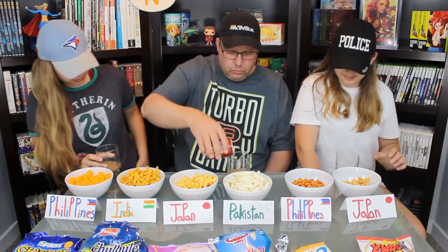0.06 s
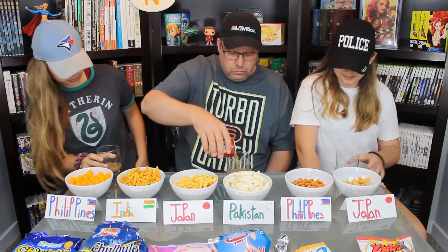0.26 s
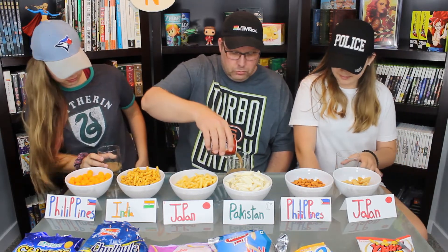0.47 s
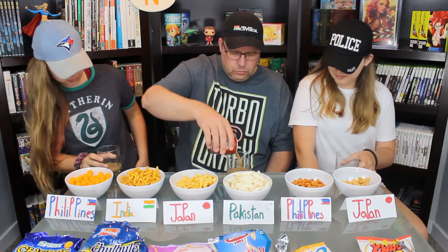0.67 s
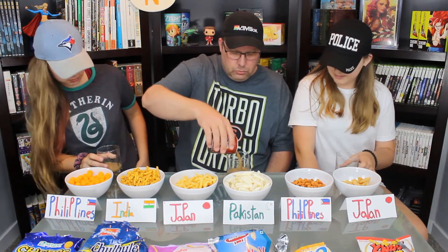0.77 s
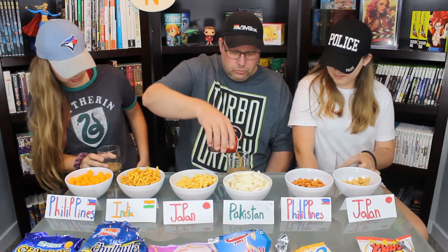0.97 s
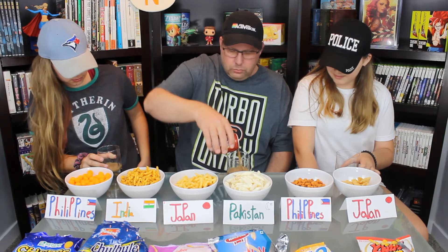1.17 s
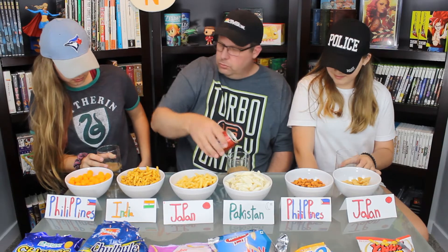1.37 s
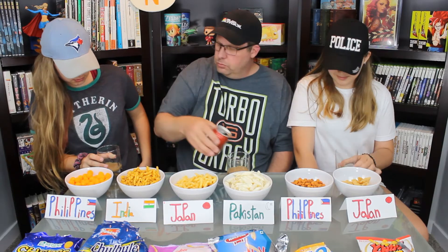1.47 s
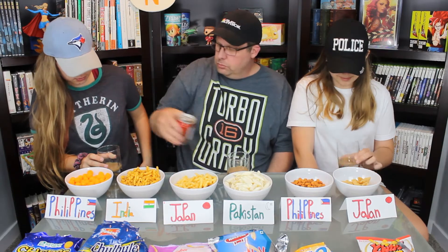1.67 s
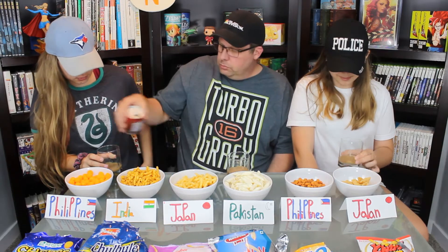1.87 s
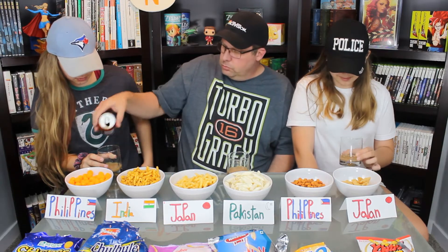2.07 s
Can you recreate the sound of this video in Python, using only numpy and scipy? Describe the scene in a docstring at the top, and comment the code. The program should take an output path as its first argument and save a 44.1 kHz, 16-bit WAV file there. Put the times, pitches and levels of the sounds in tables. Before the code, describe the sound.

Last of an iced coffee plips and trickles from a small can into a glass indoors

```python
"""Over a steady low rumble and wide hiss, there is a dull double knock on a table in a small room.
The last of an iced coffee plips, splashes and trickles from a small can into a glass.
The can ticks and clacks as it is drawn away. Blows ring decaying tones over bursts of noise,
drops ring as bubbles, splashes and trickle are shaped noise, and near walls add echoes."""
import sys
import numpy as np
from scipy import signal
from scipy.fft import rfft, irfft
from scipy.io import wavfile

SR = 44100
rng = np.random.default_rng(int(sys.argv[2]) if len(sys.argv) > 2 else 0)


def materialize(psi):
    """Save the field psi as 16-bit PCM at rate SR to the path in sys.argv[1].

    A 1-D psi becomes a single channel; in a 2-D psi each row is a channel.
    """
    bounded = np.clip(np.atleast_2d(psi).T, -1, 1)
    quanta = np.round(bounded * 32767).astype(np.int16)
    wavfile.write(sys.argv[1], SR, quanta)


N = 92610  # length in samples
T = np.arange(N) / SR  # time in seconds


def undb(db):
    """Turn decibels into a gain."""
    return 10 ** (np.asarray(db) / 20)


def fade(t60):
    """Die away exponentially, falling 60 dB in t60 seconds."""
    return np.exp(-np.log(1000) * T / max(t60, 1e-3))


def swell(rise_s):
    """Start softly, approaching full strength with this time constant in seconds."""
    return 1 - np.exp(-T / max(rise_s, 1e-5))


def place(sound, start_s):
    """Delay a sound to its start time by putting silence before it."""
    silence = np.zeros(max(int(round(start_s * SR)), 0))
    return np.concatenate([silence, sound])[:N]


def colour(sound, points):
    """Reshape the spectrum along (Hz, dB) points, then set the rms to 1."""
    hz, db = np.array(points, float).T
    bins_hz = np.maximum(np.arange(N // 2 + 1) * SR / N, 1)
    gain = undb(np.interp(np.log(bins_hz), np.log(hz), db))
    coloured = irfft(rfft(sound) * gain, N)
    return coloured / coloured.std()


def noise(points):
    """Make random noise with the given spectrum and an rms of 1."""
    return colour(rng.standard_normal(N), points)


def strike(blows, modes, spectrum, crack_db, crack_t60, snap_db, rise_s):
    """Each blow snaps, then rings the modes over a short crack; longer contact sounds duller."""
    ring = np.zeros(N)
    for hz, db, t60 in modes:
        ring += undb(db) * fade(t60) * np.sin(2 * np.pi * hz * T)
    ring *= swell(rise_s)
    snap_t60 = 0.0071  # seconds
    burst = undb(crack_db) * fade(crack_t60) + undb(snap_db) * fade(snap_t60)

    out = np.zeros(N)
    for start, db, contact_ms in blows:
        hit = ring + burst * noise(spectrum)
        # One-pole smoothing over the contact time takes off the treble
        keep = np.exp(-1000 / (max(contact_ms, .001) * SR))
        softened = signal.lfilter([1 - keep], [1, -keep], hit + 1e-18)
        out += undb(db) * place(softened, start)
    return out


# Balance of the background in the middle. Each row: pitch in Hz, relative level in dB per Hz.
MIDDLE_SPECTRUM = [(15, -51), (25, -7.5), (86, -0.5), (188, -5), (340, -10), (445, -11.5), (482, -12),
                   (703, -17), (895, -17), (1080, -19.5), (1900, -22.5), (2230, -22), (3720, -23),
                   (5880, -24), (15500, -27.5)]
# Balance of the background at the sides. Each row: pitch in Hz, relative level in dB per Hz.
SIDE_SPECTRUM = [(15, -60), (25, -14.5), (119, -14), (410, -18.5), (445, -17), (970, -22), (15500, -19)]


def background():
    """Low room rumble in the middle; microphone hiss, opposite in left and right, sounds wide."""
    middle_db, side_db = -60, -67
    middle = undb(middle_db) * noise(MIDDLE_SPECTRUM)
    side = undb(side_db) * noise(SIDE_SPECTRUM)
    return middle + side * np.array([[1], [-1]])


# Near reflections. Each row: delay in seconds, level in dB against the direct sound.
REFLECTIONS = [(.0052, -14), (.0146, -13), (.0207, -15.5), (.0368, -17.5)]


def room(sound, split_hz=2500):
    """Near walls return a few echoes and a short diffuse tail whose treble fades slightly sooner."""
    tail_db, tail_onset_s = -14, .004
    low_t60, treble_t60 = .18, .17  # seconds
    hiss = rng.standard_normal(N)
    low = signal.sosfilt(signal.butter(1, split_hz, fs=SR, output="sos"), hiss)
    treble = hiss - low
    tail = place(low * fade(low_t60) + treble * fade(treble_t60), tail_onset_s)
    tail /= np.linalg.norm(tail)
    wet = signal.fftconvolve(sound, tail)[:N]
    echoes = sum(undb(db) * place(sound, delay) for delay, db in REFLECTIONS)
    return sound + echoes + undb(tail_db) * wet


# Blows on the table. Each row: start in seconds, level in dB, contact time in ms.
TABLE_BLOWS = [(.212, -27.5, 0.56), (.2344, 3.5, 0.017), (.2495, 1.5, 0.49)]
# Ringing tones of the table and what stands on it.
# Each row: pitch in Hz, level in dB before the blow's level, time to fall 60 dB in seconds.
TABLE_TONES = [(132.2, -47.5, 0.4), (187.3, -50, 0.23), (278, -32.5, .1), (383.8, -30.5, 0.17),
               (416.7, -14, .15), (461, -19, .13), (547.5, -30.5, 0.2), (649.5, -33.5, .2),
               (801, -35.5, 0.21), (1324, -41, .1), (1935, -40.5, 0.059), (2415, -42, 0.092),
               (3480, -36.5, 0.047), (3630, -37, 0.052), (7010, -52, .1)]
# Balance of the dull crack in each blow. Each row: pitch in Hz, relative level in dB per Hz.
TABLE_CRACK_SPECTRUM = [(40, -48), (200, -14), (500, 9.5), (900, -4), (1350, -13), (1700, -17), (3600, -20),
                        (5500, -25.5), (8000, -35.5), (15000, -41)]


def table():
    """A light brush, then a dull double knock; the table top radiates little deep bass."""
    knock = strike(TABLE_BLOWS, TABLE_TONES, TABLE_CRACK_SPECTRUM,
                   crack_db=-35, crack_t60=0.17, snap_db=-46, rise_s=0.0039)
    lowest_hz = 110
    return signal.sosfilt(signal.butter(2, lowest_hz, "high", fs=SR, output="sos"), knock)


# Light touches of the can's lip. Each row: start in seconds, level in dB, contact time in ms.
LIP_TOUCHES = [(1.3795, -8.5, 0.014), (1.384, -1.5, 0.0097), (1.3876, 1, 0.014), (1.4045, 2, 0.092)]
# Ringing tones of the lip.
# Each row: pitch in Hz, level in dB before the touch's level, time to fall 60 dB in seconds.
LIP_TONES = [(1124, -37.5, .07), (1950, -50, 0.053), (2150, -43.5, 0.11), (2950, -46.5, 0.14),
             (5940, -42, 0.033), (6370, -32, 0.04), (6586, -32.5, 0.034), (6820, -31, .06),
             (10750, -48, .05), (13050, -46, 0.046)]
# Balance of the crack in each touch. Each row: pitch in Hz, relative level in dB per Hz.
LIP_CRACK_SPECTRUM = [(100, -38), (750, -12), (1200, -7), (3000, -13), (4500, -18), (6500, 5), (9000, -15),
                      (11500, -5), (15500, -29)]


def can_lip():
    """Light touches make the lip of the can chatter with thin, short tones."""
    return strike(LIP_TOUCHES, LIP_TONES, LIP_CRACK_SPECTRUM,
                  crack_db=-37.5, crack_t60=0.053, snap_db=-52, rise_s=0.0014)


# Full blows of the can's body. Each row: start in seconds, level in dB, contact time in ms.
CAN_BLOWS = [(1.4218, -5, 0.014), (1.4245, 1, 0.04), (1.4591, -8, 0.59)]
# Ringing tones of the emptied can.
# Each row: pitch in Hz, level in dB before the blow's level, time to fall 60 dB in seconds.
CAN_TONES = [(1007.4, -42, 0.18), (1031, -20, 0.073), (1119, -37.5, 0.15), (1400, -29, 0.048),
             (1444, -34, 0.13), (1527, -35.5, 0.15), (1729, -34.5, .11), (2865, -25, 0.054),
             (2923, -28.5, 0.084), (3250, -34.5, 0.062), (4027, -45.5, .09), (4390, -39, 0.065),
             (6300, -41, .05), (10400, -65, 0.038)]
# Balance of the crack in each blow. Each row: pitch in Hz, relative level in dB per Hz.
CAN_CRACK_SPECTRUM = [(100, -27), (700, -10), (1300, 6.5), (2200, -8), (3100, 2.5), (3650, -11),
                      (4200, -0.5), (4900, -14), (6000, 7.5), (7500, -28), (8200, -2), (9000, -9.5),
                      (10000, 0.5), (11900, -8), (12600, -22), (15500, -37)]


def can_body():
    """The hollow body clacks and rebounds, ringing the tones of the empty can."""
    return strike(CAN_BLOWS, CAN_TONES, CAN_CRACK_SPECTRUM,
                  crack_db=-33.5, crack_t60=0.12, snap_db=-26.5, rise_s=0.0022)


# Strength of the thin trickle over time. Each row: time in seconds, level in dB.
TRICKLE_LEVEL = [(.88, -105), (.95, -74), (1.0, -62), (1.05, -70.5), (1.11, -66.5), (1.17, -80),
                 (1.221, -65.5), (1.255, -63.5), (1.37, -63.5), (1.42, -81)]
# Balance of the trickle. Each row: pitch in Hz, relative level in dB per Hz.
TRICKLE_SPECTRUM = [(700, -31), (1700, -6.5), (2200, -1.5), (3400, 0.5), (4800, -12), (7000, -19),
                    (15000, -16)]


def trickle():
    """Dense tiny droplets, made as random clicks, fizz on the surface as the can runs dry."""
    drops_per_s, scatter_db = 3200, 1.5
    lands = rng.random(N) < drops_per_s / SR
    strength = rng.standard_normal(N) * undb(scatter_db * rng.standard_normal(N))
    times, db = np.array(TRICKLE_LEVEL).T
    # Silent before the first row and after the last
    level = undb(np.interp(T, times, db, left=-np.inf, right=-np.inf))
    return colour(lands * strength, TRICKLE_SPECTRUM) * level


# Short splashes, and last a tick as the can rebounds.
# Each row: start in seconds, centre pitch in Hz, level in dB, time to fall 60 dB in seconds.
SPLASH_AND_TICK_BURSTS = [(0.311, 1080, -48.5, .12), (.329, 1880, -57, 0.13), (0.342, 5900, -59, 0.092),
                          (0.36, 3770, -60, .08), (0.444, 4500, -61, 0.054), (.445, 840, -50.5, 0.25),
                          (0.596, 2540, -61, 0.24), (0.645, 5900, -51.5, .05), (1.261, 3640, -49, .12),
                          (1.358, 4740, -53.5, 0.14), (1.471, 4000, -45, .07)]
# Balance of every burst. Each row: multiple of the centre pitch, relative level in dB per Hz.
BURST_SPECTRUM = [(.04, -42), (.15, -26), (.55, -14), (1, 3), (1.5, -12), (4, -32)]


def splashes_and_tick(rise_s=0.0012):
    """Small noise bursts, each around its own pitch: splashes, then a tick of the can."""
    out = np.zeros(N)
    for start, centre_hz, db, t60 in SPLASH_AND_TICK_BURSTS:
        burst = noise([(multiple * centre_hz, level) for multiple, level in BURST_SPECTRUM])
        out += place(undb(db) * swell(rise_s) * fade(t60) * burst, start)
    return out


# Bubbles left by drops. Each row: start in seconds, starting pitch in Hz, level in dB,
# time to fall 60 dB in seconds, rise in octaves per second (below zero it falls).
DROP_BUBBLES = [(0.289, 1545, -48, .16, 0.5), (0.312, 950, -44.5, 0.088, 8), (0.321, 1196, -43.5, 0.092, 5),
                (.329, 2806, -61.5, 0.26, 2), (0.338, 1143, -47.5, 0.092, -4),
                (0.364, 3750, -50.5, 0.054, 6), (.366, 880, -48, 0.061, 1.5), (0.442, 1659, -53, 0.13, 0.5),
                (.445, 822, -37, 0.057, 6), (0.496, 1090, -53, 0.07, 0), (.541, 1920, -59, 0.054, -0.5),
                (.553, 1075, -54.5, 0.074, -1), (.645, 5296, -38, 0.062, 1.5),
                (0.671, 1034, -48, 0.067, 1.5), (0.6799, 5340, -41, 0.036, 7.5),
                (0.684, 1920, -50, 0.062, 2), (.720, 3160, -50.5, 0.069, 1.5),
                (1.092, 1940, -45, 0.051, 0.5), (1.2657, 3392, -41.5, 0.09, 0),
                (1.357, 1100, -50.5, 0.085, 9)]


def drips():
    """Drops trap bubbles that ring briefly and unevenly, most of them rising in pitch."""
    rise_s, roughness, wobble_hz = .0025, .5, 60
    out = np.zeros(N)
    for start, hz, db, t60, octaves_per_s in DROP_BUBBLES:
        pitch_hz = hz * 2 ** (octaves_per_s * T)
        phase = 2 * np.pi * np.cumsum(pitch_hz) / SR
        # Slow noise on the cosine makes the ring uneven
        wobble = noise([(wobble_hz, 0), (10 * wobble_hz, -40), (SR / 2, -100)])
        ring = np.sin(phase) + roughness * wobble * np.cos(phase)
        out += place(undb(db) * swell(rise_s) * fade(t60) * ring, start)
    return out


def scene():
    """Everything on the table sounds straight ahead in the room, over the background."""
    pouring_and_tick = trickle() + splashes_and_tick() + drips()
    return background() + room(table() + can_lip() + can_body() + pouring_and_tick)


def record(dry):
    """The recorder cuts the top of the treble with a steep low-pass filter."""
    top_hz = 15800
    return signal.sosfilt(signal.ellip(10, .1, 70, top_hz, fs=SR, output="sos"), dry)


dry = scene()
out = record(dry)
materialize(out)
```